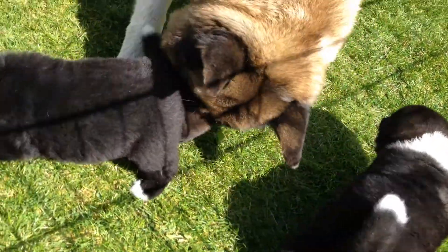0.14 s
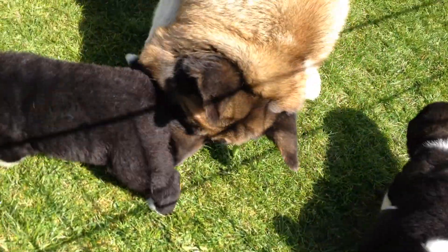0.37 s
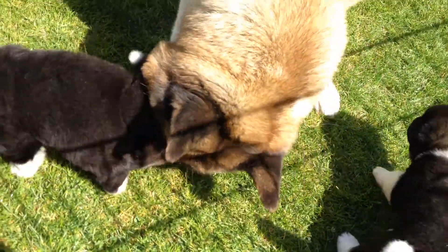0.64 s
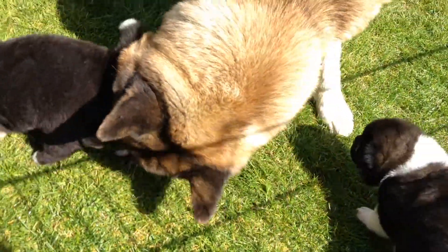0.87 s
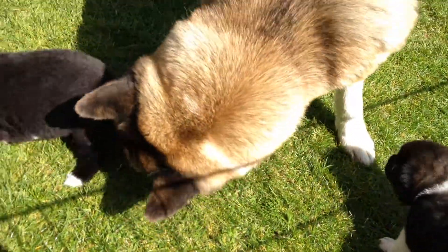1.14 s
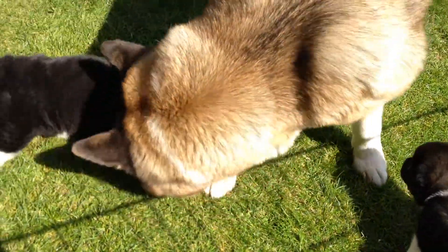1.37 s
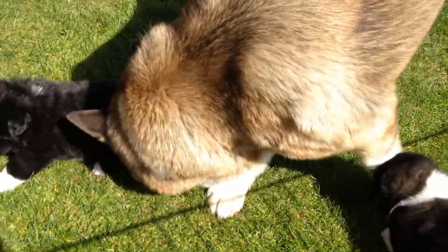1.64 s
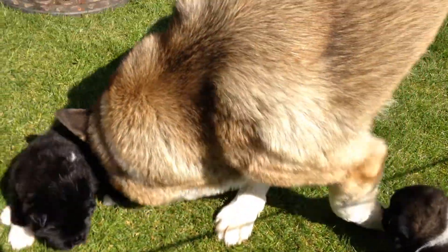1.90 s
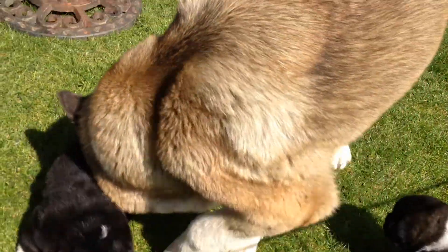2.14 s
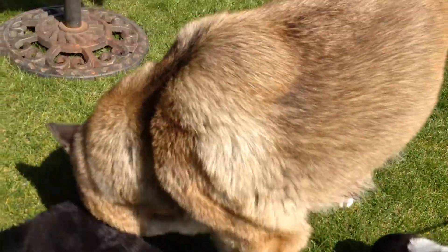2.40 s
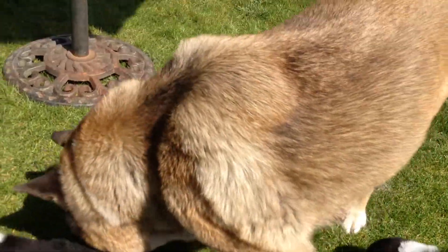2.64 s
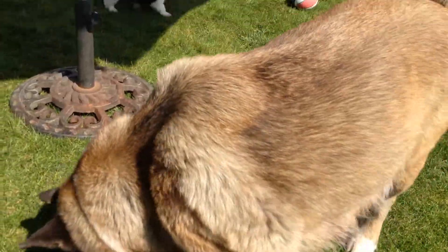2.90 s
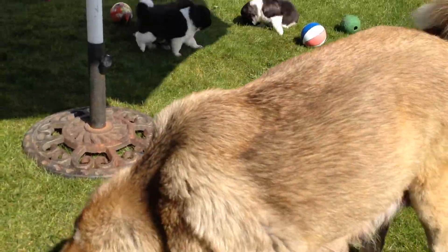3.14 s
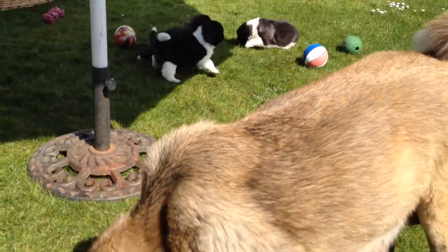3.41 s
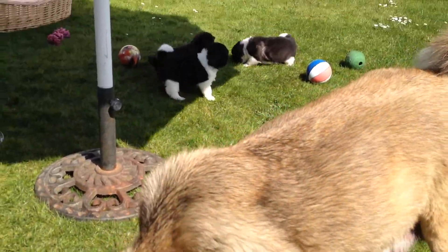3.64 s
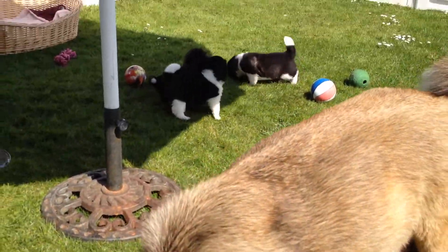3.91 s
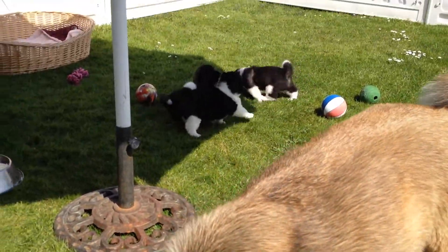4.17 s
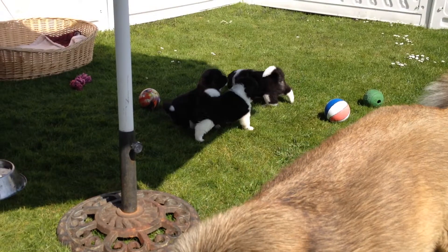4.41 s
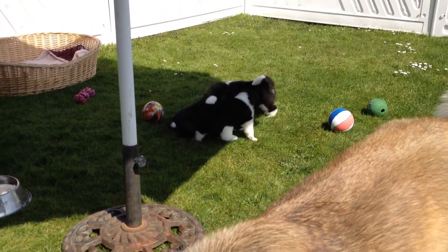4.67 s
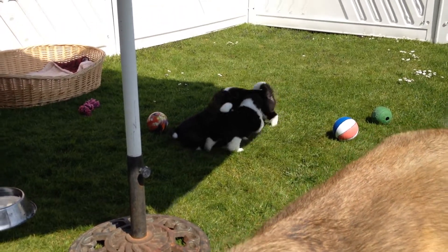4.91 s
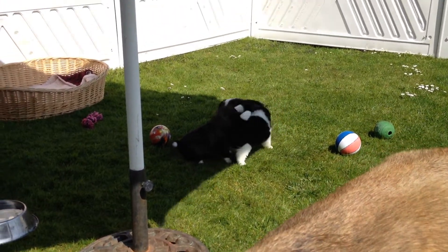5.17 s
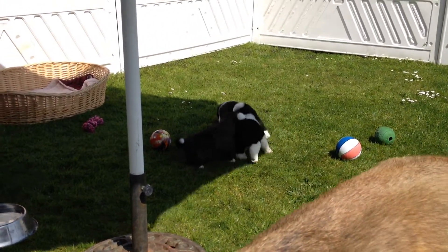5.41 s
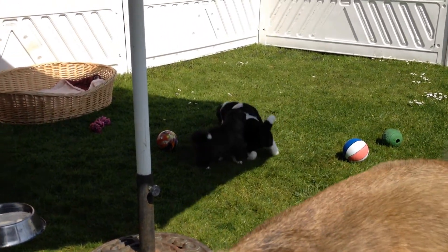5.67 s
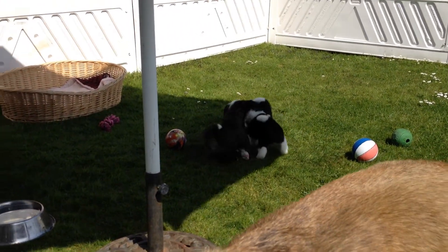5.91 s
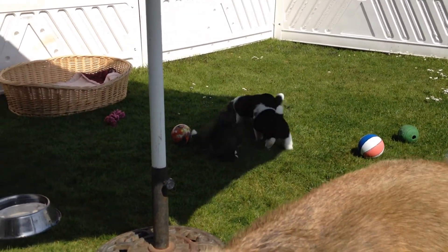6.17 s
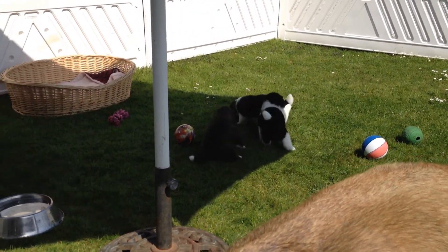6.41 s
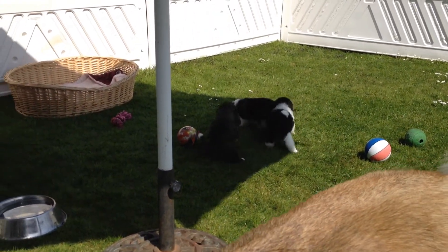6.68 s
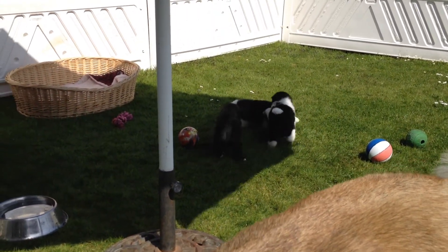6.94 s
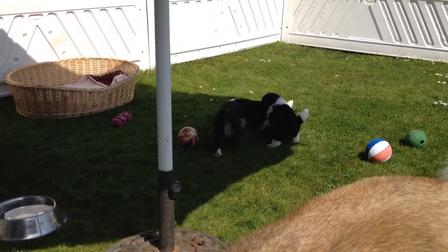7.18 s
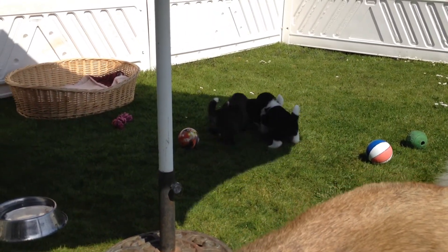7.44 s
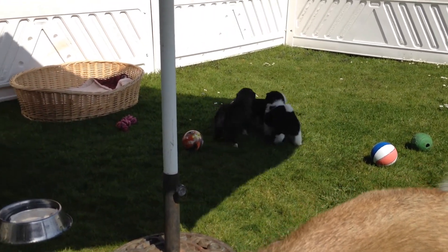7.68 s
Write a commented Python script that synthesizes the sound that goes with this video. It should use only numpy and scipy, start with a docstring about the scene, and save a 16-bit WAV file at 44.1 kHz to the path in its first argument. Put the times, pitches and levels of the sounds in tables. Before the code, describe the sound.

A puppy close by yelps shrilly about nine times, some breaking into a rasp, then fades into short weak yips amid buffeting wind and birds.

```python
"""A fenced garden: close to a small hand-held microphone a puppy gives arched yelps, mostly long, some breaking
into a rasp, then short yips. Its voice is summed overtones with filtered breath; pulses ring the throat in rasps.
Thin gliding whistles lead into every cry and follow most; squeezed glides lead into the yips. Birds are gliding
sines over drifting noise bands, and the fence echoes them and the puppy. Wind is filtered noise and low shoves
at the microphone; paws scuffle, the casing ticks twice, and late on a big dog pants softly."""
import sys
import numpy as np
from scipy import signal
from scipy.io import wavfile
from scipy.ndimage import uniform_filter1d

SR = 44100
rng = np.random.default_rng(int(sys.argv[2]) if len(sys.argv) > 2 else 0)


def gain_from_db(level_db):
    """Turn a decibel level (scalar or array-like) into a linear amplitude factor."""
    decades = np.asarray(level_db, float) / 20
    return 10 ** decades


def persist_wave(psi):
    """Save psi, clipped to +-1, as 16-bit WAV."""
    counts = np.round(np.clip(psi, -1, 1) * 32767).astype(np.int16)
    wavfile.write(sys.argv[1], SR, np.atleast_2d(counts).T)


N = 344404
T = np.arange(N) / SR

# Arched yelps without a lead-in glide, mostly long; the last is brief and duller. Each row: start in seconds,
# length in seconds, peak pitch in Hz, end pitch in Hz, base level in dB.
ARCHED_YELPS = [(0.101, 0.16, 896, 790, -46.5), (0.425, 0.23, 878, 790, -45),
                (0.819, 0.23, 970, 794, -40.5), (1.209, 0.26, 1123, 818, -35.5),
                (1.624, 0.22, 953, 808, -42), (1.992, 0.24, 1041, 877, -41),
                (2.399, 0.23, 1014, 739, -37.5), (2.789, 0.12, 848, 822, -44),
                (3.088, 0.088, 803, 800, -40.5)]
# Short yips. Each row: start in seconds, length in seconds, start pitch in Hz, peak pitch in Hz, base level in dB.
SHORT_YIPS = [(3.354, 0.11, 817, 964, -38.5), (3.642, 0.09, 830, 894, -40.5), (3.91, 0.082, 787, 805, -42),
              (4.171, 0.037, 599, 604, -47.5), (4.408, 0.034, 584.5, 619, -47),
              (4.637, 0.059, 853, 855, -35.5), (4.911, 0.065, 775, 783, -41.5),
              (5.167, 0.039, 527, 566, -52), (5.405, 0.021, 557, 550, -55.5), (5.638, 0.035, 630, 622, -51)]
# Where the voice breaks into slow pulses. Each row: start in seconds, length in seconds, level in dB,
# unevenness from 0 to 1.
RASP_SPELLS = [(0.847, 0.18, -42, 0.25), (1.24, 0.0486, -39.5, 0.13), (1.342, 0.18, -52, 0.58),
               (2.077, 0.0439, -50.5, 0), (2.443, 0.11, -40, 0.1)]
RASP_HZ = 93.2  # mean puffs a second while the voice rasps
REST_HZ = 800  # pitch towards which a yip sags
SOFT_YIP_HZ = 700  # cries peaking below this end without a whistle


def level(x, db):
    """Scale to an rms level."""
    return x * gain_from_db(db) / np.sqrt(np.mean(x ** 2))


def band(x, hz, width_hz):
    """A resonance with gain 1 at its centre."""
    return signal.lfilter(*signal.iirpeak(hz, hz / width_hz, fs=SR), x)


def twice(x, hz, width_hz):
    """The same resonance passed twice, for steeper sides."""
    return band(band(x, hz, width_hz), hz, width_hz)


def walk(rate):
    """Smooth random wander around 0, from about `rate` fresh values a second."""
    k = int(SR / rate)
    steps = np.repeat(rng.standard_normal(N // k + 1), k)
    return 1.3 * uniform_filter1d(uniform_filter1d(steps, k), k)[:N]


def add(out, start_s, x):
    """Mix a short sound in at a time."""
    i = int(start_s * SR)
    out[i:i + len(x)] += x


def note(length_s, hz, end_hz, waver, rise=0.23):
    """A gliding sine that swells to peak 1 at the share `rise` of its length, then fades more slowly."""
    u = np.arange(int(length_s * SR)) / (length_s * SR)
    wobble = 1 + waver * np.roll(walk(120.0), 7)[:len(u)]
    shape = np.sin(np.pi * u ** (np.log(.5) / np.log(rise)))
    return shape * np.sin(2 * np.pi * np.cumsum((hz + (end_hz - hz) * u) * wobble) / SR)


def wind():
    """Eddies shove the membrane unevenly; the microphone's bass cut turns each shove into a short low ring."""
    # Wind strength at the microphone. Each row: time in seconds, level in dB.
    gusts = [(0.0, -58.5), (0.33, -70), (0.61, -48.5), (.98, -43), (1.12, -39.5), (1.42, -40.5), (1.6, -39),
             (1.91, -54.5), (2.12, -47.5), (2.39, -71), (3.3, -63), (3.45, -55.5), (3.7, -45.5),
             (3.89, -74.5), (4.19, -52.5), (4.56, -69.5), (5.3, -72.5), (7.0, -60), (7.27, -70),
             (7.52, -53), (7.81, -61.5)]
    # The hardest single buffets. Each row: time in seconds, peak in dB ahead of the bass cut.
    buffets = [(0.769, -23.5), (0.871, -19.5), (1.051, -27), (1.084, -16), (1.103, -19), (1.12, -17),
               (1.15, -18.5), (1.161, -21), (1.2, -16.5), (1.295, -21), (1.307, -17), (1.334, -24),
               (1.352, -16), (1.386, -24.5), (1.466, -24), (1.511, -16), (1.539, -19.5), (1.568, -16),
               (1.594, -13), (1.622, -20.5), (1.79, -30.5), (2.036, -20.5), (2.057, -23.5), (2.2, -28),
               (2.721, -31), (3.179, -25.5), (3.382, -25), (3.464, -32), (3.517, -30.5), (3.615, -27),
               (3.983, -30), (4.137, -32), (6.994, -34.5), (7.151, -23.5), (7.528, -28.5), (7.544, -34),
               (7.56, -32)]
    wake_db, wake_s = -23, 0.018  # rumble stirred up around each buffet, relative to its peak
    crackles, crackle_db = 500, 14  # number of small random shoves, greatest peak over the wind strength
    wakes = sum(gain_from_db(db + wake_db) * np.exp(-abs(T - s) / wake_s) for s, db in buffets)
    strength_db = 20 * np.log10(gain_from_db(np.interp(T, *np.transpose(gusts))) + wakes)

    eddies = rng.standard_normal(N) * gain_from_db(6.5 * walk(30))
    slow_band = signal.butter(2, [115, 230], "bandpass", fs=SR, output="sos")
    quick_band = signal.butter(3, [180, 480], "bandpass", fs=SR, output="sos")
    slow = level(signal.sosfilt(slow_band, eddies), 0)
    quick = level(signal.sosfilt(quick_band, eddies), 0)
    # stronger wind sheds smaller, quicker eddies
    rumble = gain_from_db(strength_db) * (slow + gain_from_db(1.18 * (strength_db + 25.5)) * quick)

    shoves, u = np.zeros(N), np.arange(-300, 300) / SR
    at = .01 + (T[-1] - .02) * rng.random(crackles)
    below_db = 14 * rng.random(crackles)
    small = zip(at, np.interp(at, T, strength_db) + crackle_db - below_db)
    for s, db in [*buffets, *small]:
        # harder shoves are quicker
        add(shoves, s + u[0], gain_from_db(db) * np.exp(-(u / (-.00004 * db)) ** 2))
    push = signal.sosfilt(signal.butter(4, 125, "highpass", fs=SR, output="sos"), shoves)
    return rumble + push + 0.78 * band(push, 154.0, 98.0)


def air():
    """Distant leaves, traffic and microphone hiss: half-octave bands of noise that drift a little."""
    # Colour of the background. Each row: frequency in Hz, relative level in dB per Hz.
    colour = [(180, -11.5), (300, -8.5), (515, -6.5), (669, -3.5), (959, -10.5), (1440, -14), (4050, -12.5),
              (9800, -29.5), (15000, -21)]
    colour_hz, colour_db = np.transpose(colour)
    out = 0
    for hz in 250 * 2 ** np.arange(0, 6.1, .5):
        db = np.interp(np.log(hz), np.log(colour_hz), colour_db) + 2.33 * walk(19)
        out = out + gain_from_db(db) * band(rng.standard_normal(N), hz, hz / 3)
    return level(out, -67)


def cries():
    """Every cry as (s, length s, start Hz, peak Hz, end Hz, base level dB)."""
    # a yelp starts at 750 Hz, or lower if its peak is low
    arched = [(s, length, min(750, .79 * peak_hz), peak_hz, end_hz, db)
              for s, length, peak_hz, end_hz, db in ARCHED_YELPS]
    short = [(s, length, start_hz, peak_hz, REST_HZ, db) for s, length, start_hz, peak_hz, db in SHORT_YIPS]
    return arched + short


def nose_whistles():
    """Breath through the nose whistles as a thin gliding sine just ahead of each cry and after most."""
    # The whistles as the panting quickens. Each row: time in seconds, pitch on the way in in Hz,
    # its peak in dB, peak of the whistle after the cry in dB.
    nose = [(0.1, 8750, -69.5, -70), (1.601, 8700, -61.5, -56), (2.4, 8400, -65, -62),
            (3.5, 9400, -59.5, -53), (4.3, 9580, -66, -62), (4.9, 9800, -60, -59.5),
            (5.7, 10070, -69, -68.5)]
    out = np.zeros(N)
    times, *columns = np.transpose(nose)
    for s, length, _, peak_hz, _, _ in cries():
        hz, before_db, after_db = (np.interp(s, times, column) for column in columns)
        add(out, s - .022, gain_from_db(before_db) * note(0.041, hz * 0.989, hz * 1.01, 0.022))
        if peak_hz > SOFT_YIP_HZ:
            add(out, s + length - .005, gain_from_db(after_db) * note(0.025, 7930, 8590, 0.019))
    return out


def arch(t, length, start_hz, peak_hz, end_hz):
    """Pitch of a cry t s after its start: an easing climb, slower for a wider leap, then a sag."""
    short_s = .092  # shorter cries climb throughout and stop at their peak
    climb = .03 + (peak_hz - start_hz) / 6500 if length > short_s else length
    up = np.sin(np.pi / 2 * np.clip(t / climb, 0, 1))
    # the highest peaks are held before they sag
    held = climb + max(peak_hz - 1050, 0) * .0007
    down = np.clip((t - held) / max(length - held, 0.08), 0, None) ** .9
    # a last drop as the breath runs out
    droop_hz = 59.2 * np.exp(np.minimum(t - length, 0) / 0.0175) * (length > climb)
    return start_hz + (peak_hz - start_hz) * up - max(peak_hz - end_hz, 0) * down - droop_hz


def throat(x):
    """The open throat: steep resonances with dark valleys between."""
    # Throat resonances. Each row: centre in Hz, width of one pass in Hz, gain in dB.
    modes = [(936, 150, 28.5), (1174, 290, 24), (1730, 143, 18.5), (3280, 580, 9), (4010, 1470, 5.5)]
    return sum(gain_from_db(db) * twice(x, hz, width_hz) for hz, width_hz, db in modes)


def voiced_cries():
    """Yelps and yips: a strong fundamental, overtones coloured by the throat, and breath blown through."""
    # Throat and mouth as the overtones meet them. Each row: frequency in Hz, gain in dB.
    overtone_gain = [(1100, 5.5), (1650, -9.5), (2350, -30), (2750, -19), (4100, -17), (5050, -26),
                     (5600, -36), (9000, -44)]
    # Ground echo strengthens or cancels a yelp's fundamental as its pitch sweeps.
    # Each row: frequency in Hz, gain in dB.
    ground_gain = [(700, -3.5), (780, -1), (820, 3), (855, 0), (885, -4.5), (940, -3), (1010, -8),
                   (1090, 6.5)]
    throat_hz, throat_db = np.transpose(overtone_gain)
    ground_hz, ground_db = np.transpose(ground_gain)
    out, jitter = np.zeros(N), 1 + 0.016 * walk(200)
    flicker = [gain_from_db(4 * walk(110) + 3 * walk(22)) for _ in range(8)]
    breath = level(throat(rng.standard_normal(N)), -16)

    # while the voice rasps the folds lose their steady beat, the tone sinks and the puffs chop it
    spells = [np.interp(T, [s, s + 0.3 * length, s + 0.78 * length, s + length], [0, 1, 1, 0])
              for s, length, _, _ in RASP_SPELLS]
    hoarse = sum(spells)
    sunk = gain_from_db(-20 * sum(row[-1] * spell for row, spell in zip(RASP_SPELLS, spells)))
    jitter = jitter + 0.0342 * hoarse * walk(300)
    chop = 1 + 0.23 * hoarse * np.cos(2 * np.pi * np.cumsum(RASP_HZ * gain_from_db(1.5 * walk(60))) / SR)

    for n, (s, length, start_hz, peak_hz, end_hz, db) in enumerate(cries()):
        on = (T >= s - .05) & (T < s + length + .1)
        t = T[on] - s
        glide = uniform_filter1d(arch(t, length, start_hz, peak_hz, end_hz), int(0.012 * SR))
        pitch = glide * jitter[on]
        phase = 2 * np.pi * np.cumsum(pitch) / SR
        # edges in dB a second
        edge = gain_from_db(-2400 * np.maximum(-t, 0) - 2600 * np.maximum(t - length, 0))

        # the fundamental swells in over about 12 ms
        first_db = db - 5.0 * np.exp(-np.maximum(t, 0) / 0.012)
        if n < len(ARCHED_YELPS):
            first_db = first_db + np.interp(np.log(glide), np.log(ground_hz), ground_db)
        tone = np.sin(phase)
        if peak_hz < SOFT_YIP_HZ:
            # low yips beat strong-weak, which adds a line at one and a half times the pitch
            tone = tone + gain_from_db(-10) * flicker[7][on] * np.sin(3 * phase / 2)
        first = np.sqrt(2 * np.sqrt(flicker[0][on])) * gain_from_db(first_db) * tone

        upper = 0
        for k in range(2, 9):
            gain_db = np.interp(np.log(k * pitch), np.log(throat_hz), throat_db)
            if length < .12:
                # half-shut jaws of short cries dull the overtones, most around 2900 Hz
                gain_db = gain_db - 15 * np.exp(-(np.log2(k * pitch / 2900) / .45) ** 2) - 4.5 * (k > 2)
            upper = upper + gain_from_db(gain_db) * flicker[k - 1][on] * np.sin(k * phase)

        # the mouth is widest, and the cry brightest, where the pitch is highest
        bright_db = 10.5 * np.log2(max(peak_hz, REST_HZ) / 900)
        tire_db = -5 * t / length  # overtones and breath fade as the breath runs down
        mouth = gain_from_db(db + bright_db) * gain_from_db(tire_db) * (pitch / peak_hz) ** 2
        out[on] += edge * chop[on] * (sunk[on] * (first + mouth * upper) + mouth * breath[on])
    return out


def fence(x):
    """Short diffuse echo from the panels around the lawn: noise that falls 60 dB in 0.19 s."""
    t = np.arange(int(.3 * SR)) / SR
    tail = rng.standard_normal(len(t)) * gain_from_db(-60 * t / 0.19) * (t > .012)
    return signal.fftconvolve(x, gain_from_db(-12) * tail / np.sqrt(np.sum(tail ** 2)))[:N]


def rasps():
    """Uneven puffs, about ninety a second, ring the throat; air hisses after each."""
    out = np.zeros(N)
    for s, length, db, uneven in RASP_SPELLS:
        chance = rng.standard_normal((40, 2))
        puffs = np.zeros(int(length * SR))
        at = (np.cumsum(np.exp(uneven * chance[:, 0])) / RASP_HZ * SR).astype(int)
        keep = at < len(puffs)
        puffs[at[keep]] = gain_from_db(0.27 * chance[keep, 1])
        hiss = signal.lfilter([1], [1, -.998], puffs) * rng.standard_normal(len(puffs))
        fade = signal.windows.tukey(len(puffs), .4) * gain_from_db(np.linspace(0, -11, len(puffs)))
        add(out, s, level(throat(puffs + 0.3 * hiss) * fade, db))
    return out


def birds_and_high_whistle():
    """Short gliding sines whose level flutters: birds beyond the lawn, and one thin whistle of the puppy."""
    # Bird notes, and one very high thin whistle as the third yelp ends. Each row: start in seconds,
    # length in seconds, start pitch in Hz, end pitch in Hz, peak in dB ahead of the flutter.
    thin_notes = [(1.018, 0.072, 4230, 5230, -57), (1.038, 0.028, 11660, 11700, -60),
                  (1.117, 0.11, 4240, 3710, -63.5), (3.079, 0.17, 3960, 4690, -65),
                  (3.664, 0.41, 2716, 2850, -70.5), (4.695, .016, 4260, 5100, -71),
                  (4.71, 0.032, 5230, 4500, -60), (4.786, 0.012, 4700, 5560, -63),
                  (4.873, 0.015, 5600, 4470, -61), (4.943, 0.12, 6070, 5880, -65.5),
                  (5.03, 0.29, 7400, 7240, -70), (5.286, 0.14, 2000, 1984, -73),
                  (5.343, 0.029, 3500, 3550, -61), (5.387, 0.1, 4220, 3000, -59),
                  (5.446, 0.081, 2990, 2950, -69)]
    out, flutter = np.zeros(N), gain_from_db(4 * walk(150))
    for s, length, hz, end_hz, db in thin_notes:
        tone = note(length, hz, end_hz, 0.004 + .07 * abs(end_hz / hz - 1), rise=0.3)
        add(out, s, gain_from_db(db) * tone * flutter[int(s * SR):][:len(tone)])
    return out


def rustles():
    """Paws and fur on the grass: brief scuffles of grainy noise."""
    # Scuffles. Each row: start in seconds, length in seconds, centre in Hz, level in dB ahead of the swell.
    scuffles = [(1.36, 0.32, 4150, -60), (2.356, 0.0047, 790, -53), (4.472, 0.032, 1450, -56.5),
                (5.221, 0.064, 2150, -65), (5.751, 0.039, 467, -60), (7.196, 0.03, 2670, -63),
                (7.349, 0.0088, 1880, -57), (7.642, 0.019, 750, -56)]
    out = np.zeros(N)
    for s, length, hz, db in scuffles:
        grain = (rng.standard_normal(N) * gain_from_db(1.5 * walk(70)))[:int(length * SR)]
        add(out, s, level(twice(grain, hz, hz), db) * np.hanning(len(grain)))
    return out


def hoarse_chirps():
    """A further bird, breathy: a second membrane beats against the first and spreads lines either side."""
    # Double-voiced chirps. Each row: start in seconds, length in seconds, base level in dB.
    chirps = [(3.023, 0.1, -70), (3.1, 0.13, -74), (5.897, 0.15, -73), (6.014, 0.074, -73)]
    out, flutter = np.zeros(N), gain_from_db(4 * walk(150))
    for s, length, db in chirps:
        breathy = 1 + 6 * uniform_filter1d(rng.standard_normal(int(length * SR)), size=40)
        tone = note(length, 4650, 4950, 0.01) * breathy
        beat = 2.0 + np.cos(2 * np.pi * 820 * T[:len(tone)])
        add(out, s, gain_from_db(db) * tone * flutter[int(s * SR):][:len(tone)] * beat)
    return out


def squeezed_glides():
    """A squeezed gliding tone leads into each yip, and air is forced on through it as a hiss."""
    out = np.zeros(N)
    hiss = twice(rng.standard_normal(N), 1250, 560) * gain_from_db(5.2 * walk(150))
    hiss = level(hiss, -5)  # under the glide
    for s, length, _, peak_hz, db in SHORT_YIPS:
        # the glide follows 0.39 of a yip's change in level
        glide = gain_from_db(-50 + 0.39 * (db + 33.5))
        out += glide * hiss * np.interp(T, [s - .015, s + 0.0031, s + length + 0.02], [0, 1, 0]) ** .5
        # up to twice the peak pitch, or one and a half times in soft yips
        end_hz = (3 + (peak_hz > SOFT_YIP_HZ)) / 2 * peak_hz
        add(out, s - .03, glide * note(0.039, 840.0, end_hz, 0.043, rise=0.34))
    return out


def ticks():
    """A double tick on the casing: sharp clicks with a brief bright ring of hard plastic."""
    # The taps. Each row: time in seconds, strength in dB ahead of the ring.
    taps = [(3.984, -27.5), (3.9887, -30)]
    hit = np.zeros(N)
    for s, db in taps:
        add(hit, s, gain_from_db(db) * rng.standard_normal(60) * np.exp(-np.arange(60) / 36.0))
    ring = 2.7 * band(hit, 7800.0, 1000.0) + band(hit, 10000.0, 2660.0)
    return ring + 1.05 * band(hit, 800.0, 2400.0) + 0.69 * band(hit, 11000.0, 3660.0)


def panting():
    """Soft panting of the big dog: unsteady breath noise coloured by its open mouth."""
    # Breaths. Each row: start in seconds, length in seconds, level at the height of the swell in dB.
    pants = [(6.55, 0.72, -69.5)]
    # Its mouth. Each row: centre in Hz, width of one pass in Hz, gain in dB.
    pant_mouth = [(666, 520, -3), (1210, 210, -2.5), (2765, 280, -2)]
    out = np.zeros(N)
    puff = rng.standard_normal(N) * gain_from_db(4.2 * walk(40))
    puff = level(sum(gain_from_db(db) * twice(puff, hz, width_hz) for hz, width_hz, db in pant_mouth), 0)
    for s, length, db in pants:
        out += gain_from_db(db) * puff * np.interp(T, [s, s + 0.25 * length, s + length], [0, 1, 0]) ** .5
    return out


def scene():
    """Puppy and birds get the fence echo; wind and ticks act on the microphone itself."""
    cry = nose_whistles() + voiced_cries() + rasps() + squeezed_glides()
    voices = cry + birds_and_high_whistle() + hoarse_chirps()
    garden = voices + fence(voices) + air() + rustles() + panting()
    return (garden + wind() + ticks())[None]


def band_limit(x):
    """A steep low-pass at the top of the band."""
    return signal.sosfilt(signal.butter(12, 16400, fs=SR, output="sos"), x)


def record(dry):
    """A steep low-pass at 15250 Hz takes off the top of the mix."""
    top_cut = signal.ellip(10, .2, 70, 15250, fs=SR, output="sos")
    mix = signal.sosfilt(top_cut, dry)
    return band_limit(mix)


dry = scene()
out = record(dry)
persist_wave(out)
```